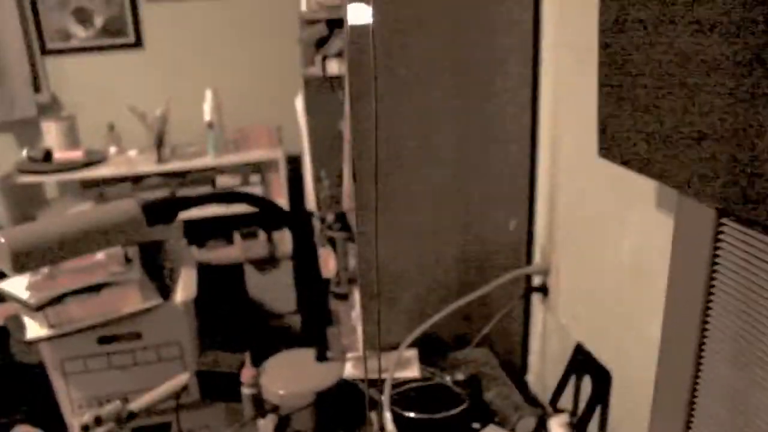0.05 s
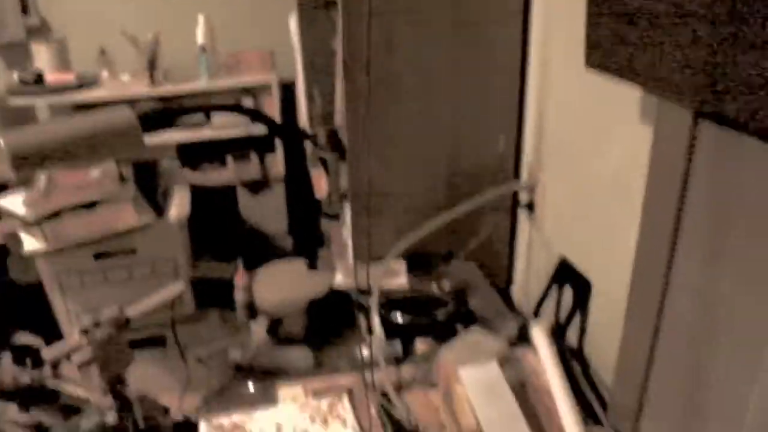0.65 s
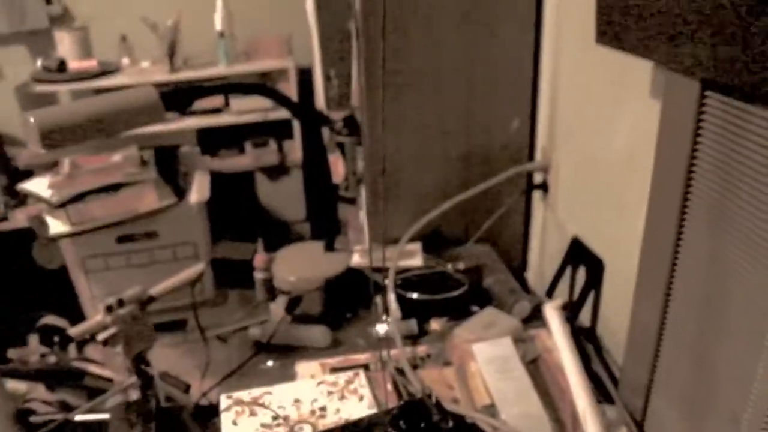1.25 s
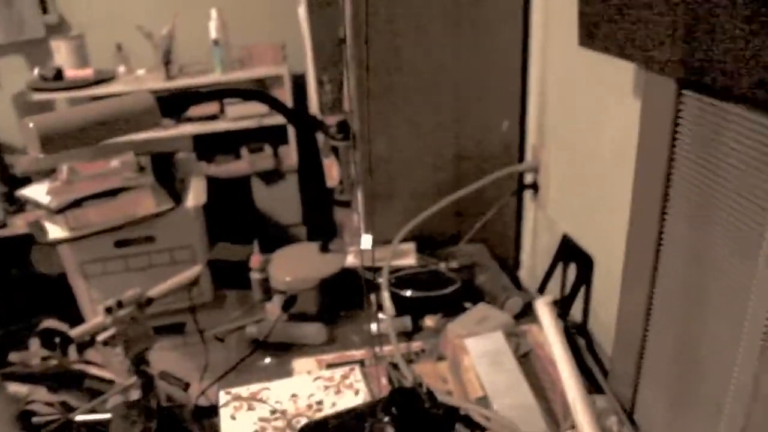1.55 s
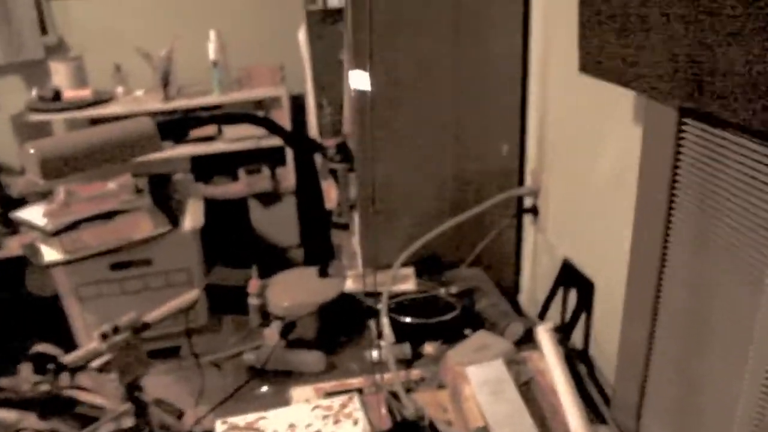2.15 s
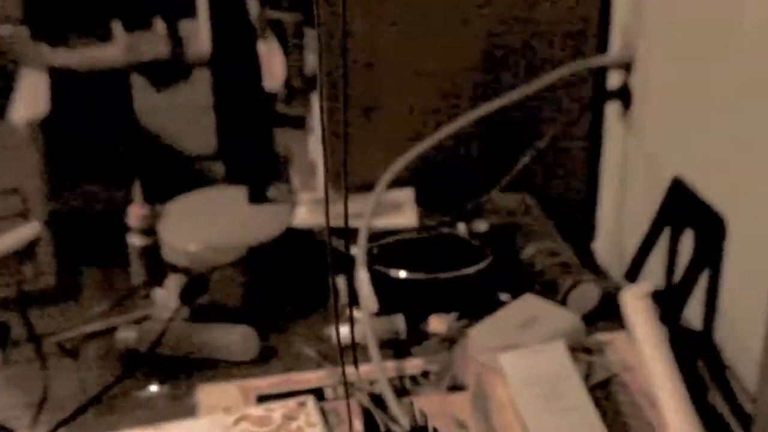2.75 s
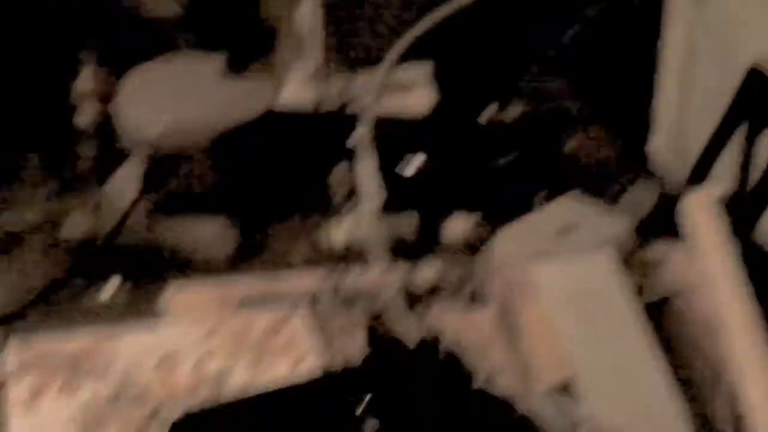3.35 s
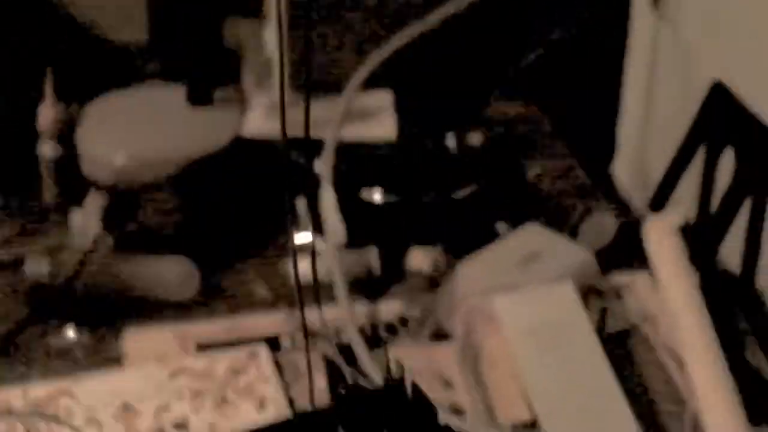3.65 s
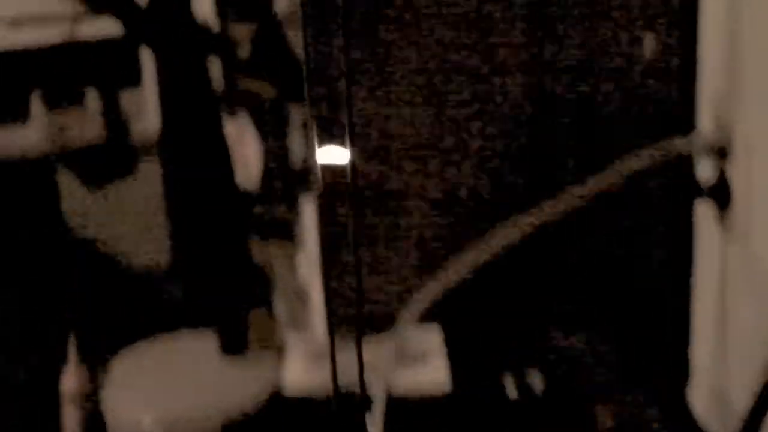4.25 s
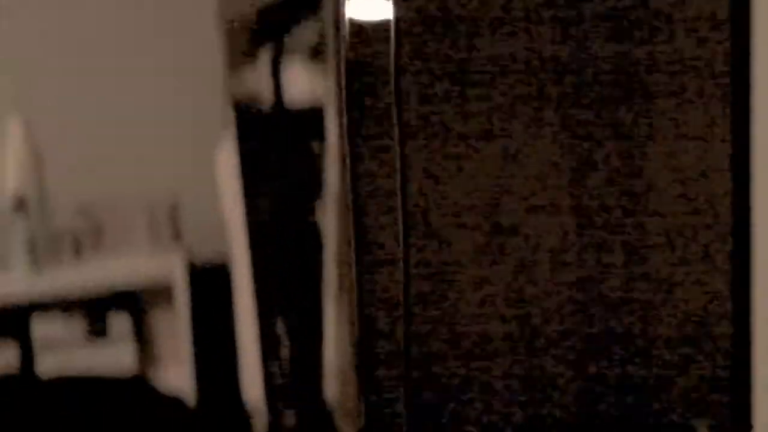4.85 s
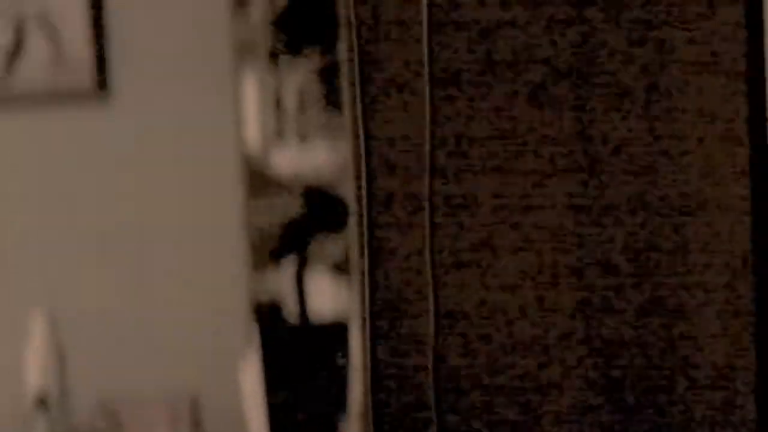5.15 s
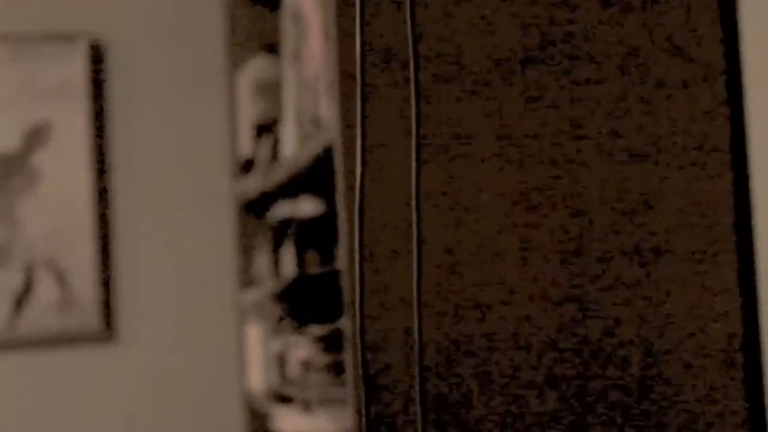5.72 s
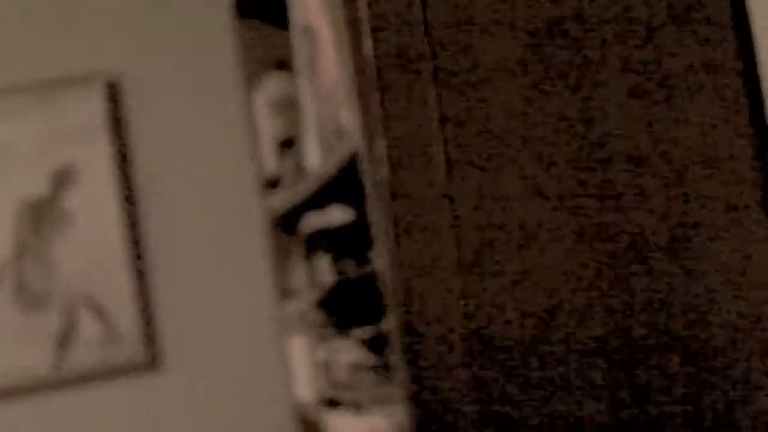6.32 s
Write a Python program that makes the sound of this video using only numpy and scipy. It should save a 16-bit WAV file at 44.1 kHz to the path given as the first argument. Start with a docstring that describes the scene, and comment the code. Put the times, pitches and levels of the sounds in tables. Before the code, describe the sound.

Close up, a sizzling electric buzz comes from an arc rising between two rods. It breaks with loud cracks after about a second, relights faintly and grows louder and fuller. The cycle repeats twice more, about two and a half seconds apart, over a low transformer hum. The small workshop adds short, tight echoes, and the hand-held microphone picks up a few light bumps and rustles.

```python
"""Climbing arc in a small workshop.

An arc rises between two upright rods, close to a hand-held microphone. It relights with a click on
every half cycle of the mains, grows as it climbs, tears off in a few loud snaps and starts again at
the bottom. The hot channel throbs over the hum of a transformer, and bench, door and walls send back
short echoes. Fingers knock and rub on the camera case that holds the microphone."""
import sys
import numpy as np
from scipy import signal
from scipy.fft import rfft, irfft
from scipy.io import wavfile
from scipy.ndimage import uniform_filter1d

SR = 44100
rng = np.random.default_rng(int(sys.argv[2]) if len(sys.argv) > 2 else 0)


def wav_record(signal):
    """Record a signal, one row per channel, as 16-bit PCM in the file named by sys.argv[1]."""
    frames = np.transpose(np.atleast_2d(signal))
    bounded = np.clip(frames, -1, 1)
    # unit amplitude maps onto the largest positive 16-bit level
    quanta = np.round(bounded * 32767).astype(np.int16)
    wavfile.write(sys.argv[1], SR, quanta)


N = 281358
TIME = np.arange(N) / SR
MS = 1e-3
MAINS_HZ, EDGE_HZ = 60, 16020
CLICK_SAMPLES = 1024
BINS = np.fft.rfftfreq(CLICK_SAMPLES, 1 / SR)

# rises of the arc: leaves the foot t/s, growth time/s, start level/dB, peak level/dB,
# midrange while young/dB, strike delay/ms
CLIMBS = [(-1.37, .7, -40, -22.5, -9, 4.05), (1.04, .61, -40.5, -22, -10, 4.03),
          (3.49, .76, -42.5, -23, -7.5, 3.8), (5.83, .46, -41, -23.5, -10.5, 3.9)]
# the arc tears off: last crack t/s, its level/dB, crescendo per cycle/dB, stutter against that crack/dB
TEARS = [(1.0035, -17, 3, -1), (3.3875, -22, 1, -23), (5.7872, -17, 2, -10)]
# spectrum of one strike: f/Hz, level/dB
CLICK_SPECTRUM = [(40, -31.5), (250, -19), (600, -23.5), (1100, -23.5), (2000, -12.5), (3200, -10),
                  (5000, -6), (7000, -2.5), (9500, 1.6), (11300, 2.6), (13000, 2.5), (14800, 1.5),
                  (16000, -6.5)]

RELIGHT_S, MISSING_S = 0.022, 0.043  # the buzz resumes this long after a tear, stops this long before
SAG_DB_PER_S = 3.5  # once grown, the arc fades as it stretches
FULL_AGE_S, FILL_S = 0.93, 0.16  # the click gains its midrange around this age, this gradually
SHEEN_DB, SHEEN_AGE_S, SHEEN_FALL_DB = 5, 1.64, 3  # the top peaks in mid climb; fall 1 s either side
LOPSIDED_DB_PER_S, FAILING_DB, FAILING_S = 2.12, 0.5, 0.13  # negative half cycles weaken, fast at the end
EARLY_MS_PER_DB, SKEW_MS_PER_DB = 0.14, 0.33  # fuller clicks and failing half cycles strike earlier
JITTER_MS, WANDER_MS, FLICKER_DB, WRITHE_DB = 0.017, 0.048, 0.5, 3.5  # chance from strike to strike
SPUTTER, YOUNG_SPUTTER, SPUTTER_AGE_S, SPUTTER_S = 0.16, 0.1, 0.51, 0.56  # stray sparks, most while young


def climb(lit, end, rise_s, grow_s, start_db, peak_db, young_db, strike_ms):
    """One rise of the arc: it relights 120 times a second, and a longer channel gives a deeper click."""
    # single strikes that flare up: t/s, extra level/dB
    flares = [(.804, 2.5), (2.721, 3), (5.687, 4)]
    half_cycle = np.arange(np.ceil(lit * 2 * MAINS_HZ), end * 2 * MAINS_HZ)
    zero_s, negative = half_cycle / (2 * MAINS_HZ), half_cycle % 2
    age = np.maximum(zero_s - rise_s, 0)
    short_db, stretched_s = growth(age, grow_s, start_db, peak_db)
    louder, fuller, brighter, _ = wavering(zero_s)
    jitter, wander, flicker = rng.standard_normal((len(half_cycle), 3)).T
    failing_db = FAILING_DB * np.exp((zero_s - end) / FAILING_S)
    lopsided_db = (LOPSIDED_DB_PER_S * age + failing_db) * (0.5 - negative)
    flare_db = sum(db * (half_cycle == np.floor(s * 2 * MAINS_HZ)) for s, db in flares)
    swell_db = peak_db + short_db - SAG_DB_PER_S * stretched_s
    level_db = swell_db + louder + flare_db + lopsided_db + FLICKER_DB * flicker
    depth_db = young_db / (1 + np.exp((age - FULL_AGE_S) / FILL_S)) + fuller
    sheen_db = SHEEN_DB - SHEEN_FALL_DB * (age - SHEEN_AGE_S) ** 2 + brighter
    late_ms = strike_ms - EARLY_MS_PER_DB * depth_db - SKEW_MS_PER_DB * failing_db * negative
    strike_s = zero_s + (late_ms + JITTER_MS * jitter + WANDER_MS * uniform_filter1d(wander, size=6)) * MS
    # a young arc breaks down in several steps
    sputter = SPUTTER + YOUNG_SPUTTER * np.exp(-((age - SPUTTER_AGE_S) / SPUTTER_S) ** 2)
    mid = curve([(100, 0.11), (900, 0.16), (2000, 0.96), (3500, 1), (5500, 1), (9000, 0)], BINS)
    top = curve([(10500, 0.82), (13000, 1), (15000, 1.57)], BINS)
    colour_db = curve(CLICK_SPECTRUM, BINS) + np.outer(depth_db, mid) + np.outer(sheen_db, top)
    # the channel writhes, so no two clicks have quite the same colour
    knots_hz = np.geomspace(700, EDGE_HZ, 12)
    writhe_db = WRITHE_DB * rng.uniform(-0.74, 1, (len(half_cycle), len(knots_hz)))
    colour_db += [np.interp(BINS, knots_hz, row) for row in writhe_db]
    return sparks(strike_s, level_db, colour_db, sputter, age, spread_ms=0.2473)


def growth(age, grow_s, start_db, peak_db):
    """How many dB the arc is still short of its peak, and for how long it has been fully grown."""
    return (start_db - peak_db) * np.clip(1 - age / grow_s, 0, 1), np.maximum(age - grow_s, 0)


def wavering(t):
    """The buzz wavers in level and colour on the way up."""
    # passing changes: t/s, half width/s, level/dB, midrange/dB, top/dB, hum overtones/dB
    wavers = [(.42, 0.24, -3, 1.5, -4, -5), (.74, 0.099, -3.5, -5, -0.5, -60), (2.2, 0.18, 0, 0, -1.5, 2.5),
              (2.92, 0.15, 0, -3, 4.5, -27.5), (4.74, 0.24, -1.8, 1.5, 0.5, -0.5),
              (4.97, 0.15, 3, -3.5, 1, -4.5), (5.27, 0.11, -0.7, 2, -6, -4.5),
              (5.6, 0.057, -2.5, -.5, -1.5, -2)]
    return sum(np.outer(changes, np.exp(-((t - s) / width) ** 2)) for s, width, *changes in wavers)


def snaps(last_s, last_db, crescendo_db, stutter_db, fizz_db=-7, age_s=2.35):
    """At the top the arc misses half cycles: three growing cracks, the last between ragged stutters."""
    cycles = np.array([-2, -1, 0, -0.5, 0.19])  # three cracks, the stutter before, the fizz after
    level_db = last_db + np.array([-2 * crescendo_db, -crescendo_db, 0, stutter_db, fizz_db])
    tilt_db = curve([(100, -11), (1000, 1), (4000, 0), (9000, 2.5), (16000, 1.5)], BINS)
    colour_db = np.tile(curve(CLICK_SPECTRUM, BINS) + tilt_db, (len(cycles), 1))
    sputter = np.where(cycles % 1 > 0, 1, 0.42)  # the cracks throw fewer stray sparks
    age = np.full(len(cycles), age_s)
    return sparks(last_s + cycles / MAINS_HZ, level_db, colour_db, sputter, age, spread_ms=0.47)


def sparks(strike_s, level_db, colour_db, sputter, age, spread_ms, stray_count=3):
    """Each strike reaches the microphone as a click, a few stray sparks just after it, and echoes."""
    stray_ms = (0.3 + rng.random((len(strike_s), stray_count))) * spread_ms
    strays = sum(delay(ms * MS) for ms in stray_ms.T)
    click = causal(colour_db) * reflections(age)
    power = np.mean(abs(click) ** 2, axis=1) * (1 + stray_count * sputter ** 2)
    click *= (amp(level_db) / np.sqrt(power))[:, None]
    click *= 1 + sputter[:, None] * strays * np.minimum(BINS / 6000, 1)  # short strays sound thin
    starts = np.floor(strike_s * SR).astype(int) - CLICK_SAMPLES // 32
    waves = irfft(click * delay(strike_s - starts / SR), axis=1) * np.sqrt(SR / MAINS_HZ / 2)
    out = np.zeros(N)
    for start, wave in zip(starts, waves):
        add(out, start, wave)
    return out


def reflections(age, door_age_s=1.06, door_ms=0.95, door_db=-7.5):
    """Paths to the microphone, as spectra: direct, off near surfaces as the arc climbs, off the walls."""
    # rod foot and bench fall behind: first delay/ms, its growth/(ms/s), level/dB, fade/(dB/s)
    receding = [(0.158, .8, -9.5, 5.5), (.75, 1.25, -1.5, 6.5)]
    # rough surfaces scatter the top: f/Hz, level/dB
    echo_colour = [(100, 0.5), (5000, -6.5), (10000, 0.5), (13000, -3), (16000, -9)]
    # wall echoes: delay/ms, level/dB
    wall_echoes = [(3.9, -24), (6.5, -13.5)]
    # the door behind the rods echoes most when the arc is level with the microphone
    off_level = (age - door_age_s) ** 2
    near = [(door_ms - 0.071 * off_level, door_db - 22 * off_level)]
    near += [(ms + speed * age, db - fade * age) for ms, speed, db, fade in receding]
    moving_comb = sum(amp(db)[:, None] * delay(ms * MS) for ms, db in near)
    walls = sum(amp(db) * delay([ms * MS]) for ms, db in wall_echoes)
    return 1 + moving_comb * amp(curve(echo_colour, BINS)) + walls


def channel_throb(low_db=-57.5, low_fade_db=3.1, overtone_db=-60.5, overtone_fade_db=2.05):
    """The hot channel hums with the current, swelling and fading with each climb."""
    # overtones of the throb: f/Hz, relative level/dB
    throb_lines = [(240, -2), (360, -2), (480, 1.5), (600, -7.5), (840, -3.5)]
    rise_s, grow_s, start_db, peak_db, _, _ = np.transpose(CLIMBS)
    k = np.searchsorted(np.array(TEARS)[:, 0] + RELIGHT_S, TIME)  # which climb is under way
    short_db, stretched_s = growth(TIME - rise_s[k], grow_s[k], start_db[k], peak_db[k])
    low = uniform_filter1d(low_db + short_db - low_fade_db * stretched_s ** 2, size=1500)
    upper = uniform_filter1d(overtone_db + short_db - overtone_fade_db * stretched_s ** 2, size=1500)
    fundamental = -np.sqrt(2) * np.cos(2 * np.pi * 2 * MAINS_HZ * TIME)
    overtones = harmonics(throb_lines, lag_ms=5.464, scatter=0.64)
    return amp(low) * fundamental + amp(upper + wavering(TIME)[-1]) * overtones


def finger_knocks(trim_db=-9, octaves=0.7, low_cut_hz=55):
    """Knocks ring the case right at the microphone, soft ones only its low modes."""
    # finger blows: t/s, level before the trim/dB, centre f/Hz, 60 dB decay/s
    blows = [(0.163, -53, 1900, 0.015), (1.068, -56, 555, 0.013), (1.179, -51, 190, 0.061),
             (1.202, -59, 497, 0.022), (1.528, -51, 90, 0.082), (1.682, -37.5, 2360, 0.019),
             (1.686, -45.5, 80, 0.048), (1.871, -48, 90, .1), (1.937, -43.5, 110, 0.092),
             (2.111, -43.5, 940, 0.017), (2.178, -36, 2600, 0.015), (2.405, -44, 201, 0.17),
             (2.422, -41.5, 690, 0.11), (2.552, -50.5, 250, 0.048), (2.973, -53.5, 300, 0.013),
             (4.09, -34.5, 575, 0.056), (4.091, -36.5, 171, 0.043), (4.128, -48, 121, 0.075),
             (5.125, -50.5, 1200, .02), (5.934, -57, 1500, 0.023), (5.982, -56.5, 1100, 0.046),
             (6.357, -45, 1800, 0.015), (6.364, -33, 520, 0.1)]
    # modes of the case: f/Hz, width/Hz, level/dB
    case_modes = [(76, 120, 16), (202, 47, 10.5), (317, 50, 1.5), (666, 450, -15.5), (1010, 93, -1),
                  (1275, 360, -8.5), (1580, 200, -10), (2720, 890, -18)]
    out, t = np.zeros(N), np.arange(SR // 5) / SR
    low_cut = signal.butter(2, low_cut_hz, "high", fs=SR, output="sos")
    for s, db, centre_hz, decay_s in blows:
        blow = rng.standard_normal(len(t)) * amp(-60 * t / decay_s)
        pole = np.exp(-2 * np.pi * 2 * centre_hz / SR)
        blow = signal.lfilter([1], [1, -pole], blow)  # a soft blow has no treble
        ring = np.zeros(len(t))
        for hz, width, mode_db in case_modes:
            drive = amp(mode_db) * width * np.exp(-0.5 * (np.log2(hz / centre_hz) / octaves) ** 2)
            ring += drive * np.exp(-np.pi * width * t) * np.cos(2 * np.pi * hz * t)
        knock = signal.sosfilt(low_cut, signal.fftconvolve(blow, ring)[:len(t)])
        add(out, round(s * SR), amp(db + trim_db) * unit(knock))
    return out


def finger_rubs(grain_db=2.0):
    """Fingers slide on the case with a close, grainy rustle."""
    # strokes: start t/s, end t/s, level/dB
    strokes = [(1.82, 2.016, -50), (2.128, 2.268, -45), (2.386, 2.5, -46.5), (2.504, 2.914, -50),
               (2.96, 3.07, -50.5), (4.07, 4.31, -44.5)]
    # skin on the case: f/Hz, level/dB
    rub_colour = [(40, -9), (150, -7), (400, -12), (800, -4), (1400, 2), (2000, -6), (3000, -8.5),
                  (8000, -37)]
    friction = noise(rub_colour)
    grain = unit(uniform_filter1d(rng.standard_normal(N), size=250))
    rustle = unit(friction * amp(grain_db * grain))
    out = np.zeros(N)
    for start, end, db in strokes:
        progress = np.clip((TIME - start) / (end - start), 0, 1)
        out += amp(db) * rustle * np.sqrt(abs(np.sin(np.pi * progress)))
    return out


def workshop_reverb(x, count=16):
    """Dense echoes off the clutter, whose pattern keeps changing as arc and microphone move."""
    # reverberation time: f/Hz, 60 dB decay/s
    room_t60 = [(150, 0.045), (1000, 0.2), (5000, 0.17), (10000, 0.12), (16000, 0.098)]
    hz, t, spectra = signal.stft(rng.standard_normal((count, SR // 3)), SR, nperseg=256)
    tails = signal.istft(spectra * amp(-60 * t / curve(room_t60, hz)[:, None]), SR, nperseg=256)[1]
    tails *= np.clip(np.arange(tails.shape[1]) / SR / 0.0037 - 0.4, 0, 1)  # builds after the direct sound
    place = TIME / TIME[-1] * 2 * count  # crossfades twice round the set of tails
    out = np.zeros(N)
    for k, tail in enumerate(tails):
        away = abs((place - k + count / 2) % count - count / 2)
        share = np.cos(np.pi / 2 * np.minimum(away, 1))
        out += signal.oaconvolve(x * share, tail / np.linalg.norm(tail))[:N]
    return out


def transformer(trim_db=-2.0):
    """The laminations of the core buzz steadily under the arc."""
    # tones of the core: f/Hz, level before the trim/dB
    core_lines = [(720, -75.5), (1080, -74), (1320, -70), (1560, -74), (1920, -69), (2040, -70),
                  (2160, -78), (2400, -84), (2640, -70), (3000, -81.5)]
    return amp(trim_db) * harmonics(core_lines, lag_ms=1.614, scatter=0.68)


def room_tone(level_db=-63.0):
    """The still workshop: a faint rumble and hiss."""
    # background spectrum: f/Hz, relative level/dB
    floor_colour = [(20, -51), (65, 1.5), (110, -9.5), (300, -19), (1000, -18), (4000, -12), (16000, -53)]
    return amp(level_db) * noise(floor_colour)


def harmonics(lines, lag_ms, scatter):
    """Tones locked to multiples of the mains, loosely bunched into one soft pulse a half cycle."""
    out = np.zeros(N)
    for hz, db in lines:
        locked_hz = np.round(hz / MAINS_HZ / 2) * 2 * MAINS_HZ
        cycles = locked_hz * (TIME - lag_ms * MS) + scatter * rng.random()
        out += np.sqrt(2) * amp(db) * np.cos(2 * np.pi * cycles)
    return out


def noise(colour):
    """Steady noise of a given spectrum."""
    gain = amp(curve(colour, np.fft.rfftfreq(N, 1 / SR)))
    return unit(irfft(rfft(rng.standard_normal(N)) * gain, N))


def delay(s):
    """One delay a row, as a spectrum."""
    return np.exp(-2j * np.pi * np.outer(s, BINS))


def causal(db):
    """Minimum-phase spectra: these gains with a sudden onset."""
    log_gain = np.log(amp(np.concatenate([db, db[:, -2:0:-1]], axis=1)))
    return np.exp(np.conj(signal.hilbert(log_gain, axis=1)))[:, :len(BINS)]


def amp(db):
    """Decibels to gain."""
    return 10 ** (np.asarray(db) / 20)


def unit(x):
    """Scales to an rms of one."""
    return x / np.sqrt(np.mean(abs(x) ** 2) + 1e-20)


def curve(points, hz):
    """Interpolates a table on a log-frequency axis."""
    f, value = np.transpose(points)
    return np.interp(np.log(hz + 1), np.log(f + 1), value)


def add(mix, start, sound):
    """Mixes a sound in at a sample index."""
    part = mix[max(start, 0):][:len(sound)]
    part += sound[:len(part)]


def scene(room_db=-4.5, shade_db=3, shade_s=0.79):
    """Arc, echoes, hum, handling and room tone at one microphone."""
    torn = np.array(TEARS)[:, 0]
    lit, ends = np.append(0, torn + RELIGHT_S), np.append(torn - MISSING_S, TIME[-1])
    arc = sum(climb(start, end, *row) for start, end, row in zip(lit, ends, CLIMBS))
    arc += sum(snaps(*row) for row in TEARS)
    # low on the rods the arc is behind clutter, so more of it arrives by way of the room
    hidden = sum((TIME > s) * np.clip(1 - (TIME - s) / shade_s, 0, 1) for s in lit[1:])
    shade = amp(-shade_db * hidden)
    mix = arc * shade + amp(room_db) * workshop_reverb(arc / shade)
    return (mix + channel_throb() + transformer() + finger_knocks() + finger_rubs() + room_tone())[None]


def record(dry):
    """The microphone signal is limited at full scale, then low-passed."""
    lowpass = signal.firwin(511, EDGE_HZ, window=("kaiser", 9), fs=SR)
    return signal.oaconvolve(np.clip(dry, -1, 1), lowpass[None], "same")


dry = scene()
out = record(dry)
wav_record(out)
```